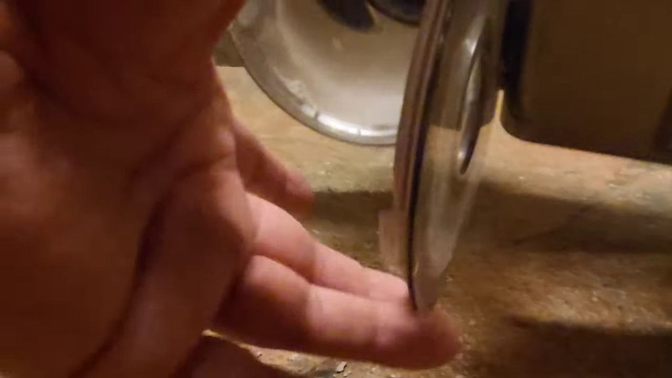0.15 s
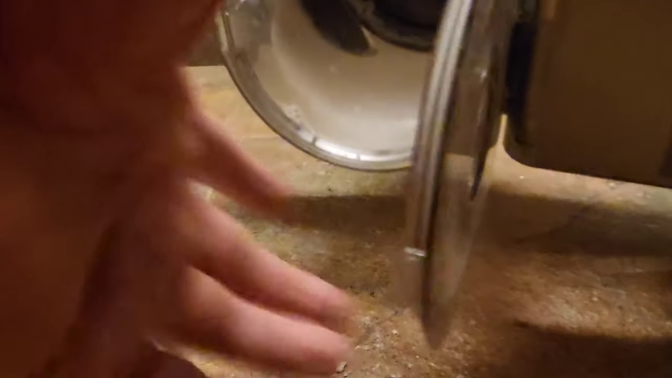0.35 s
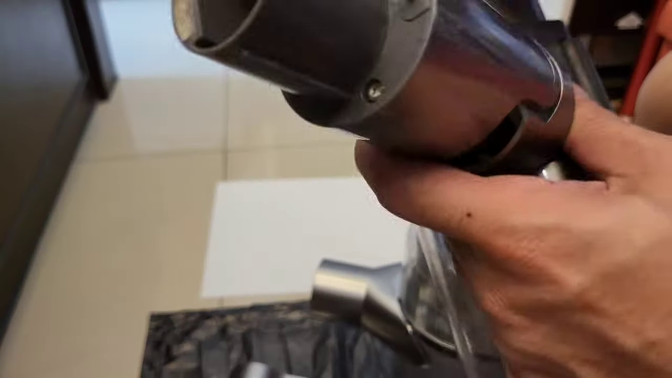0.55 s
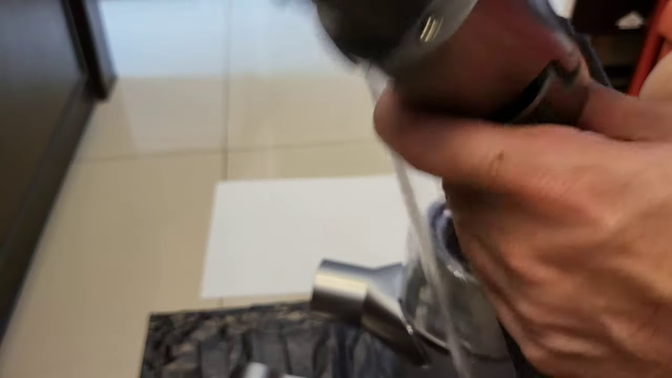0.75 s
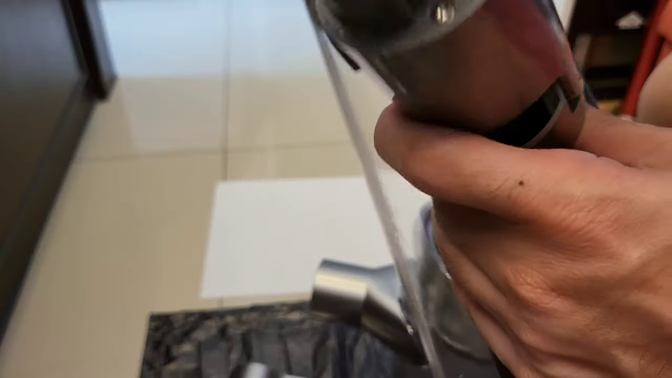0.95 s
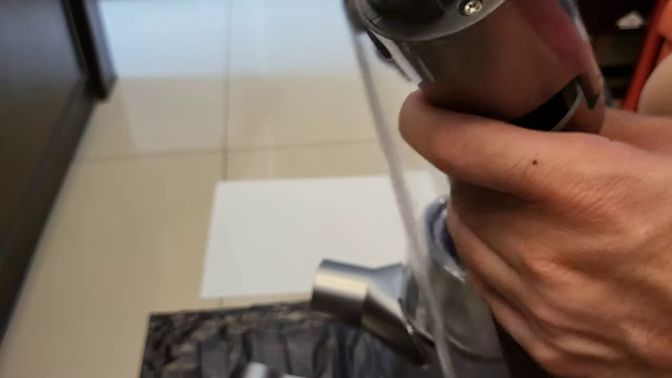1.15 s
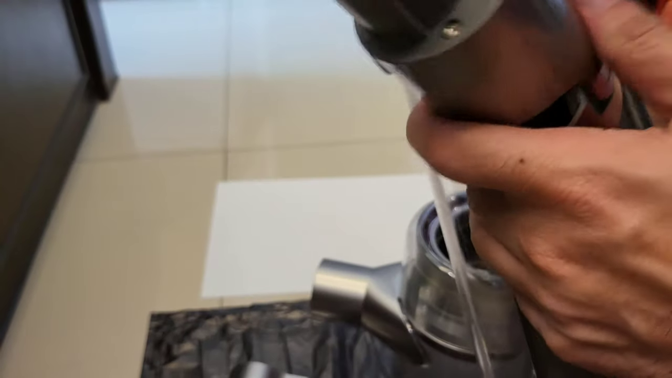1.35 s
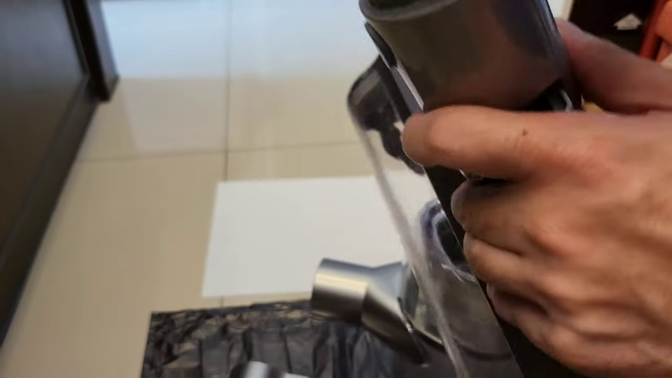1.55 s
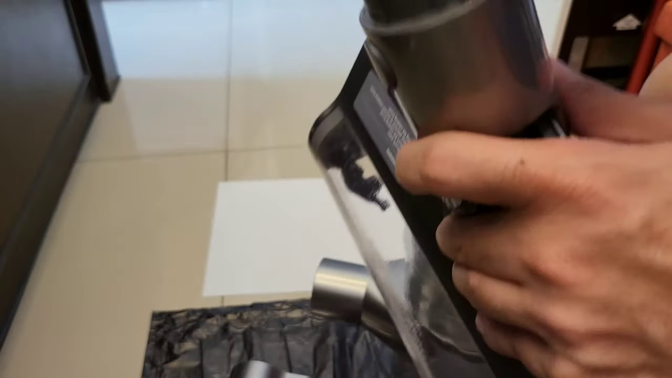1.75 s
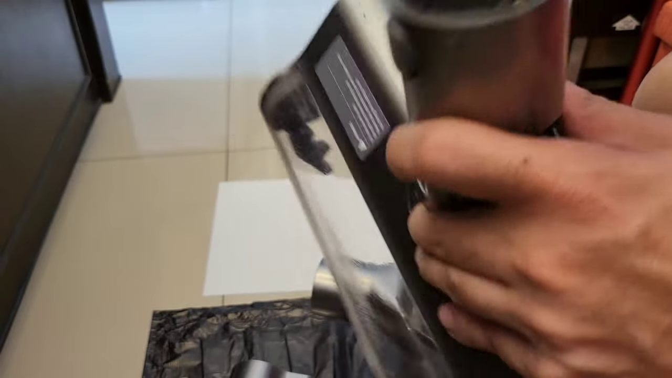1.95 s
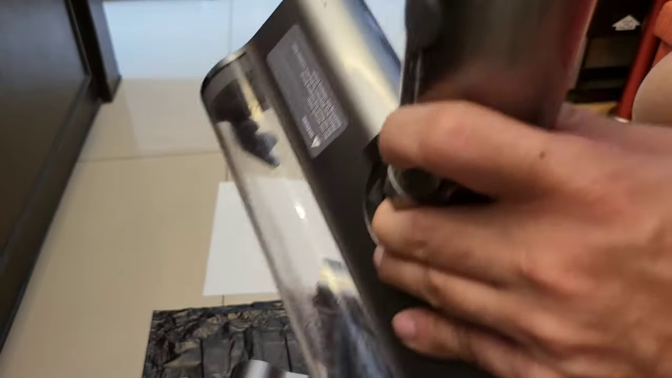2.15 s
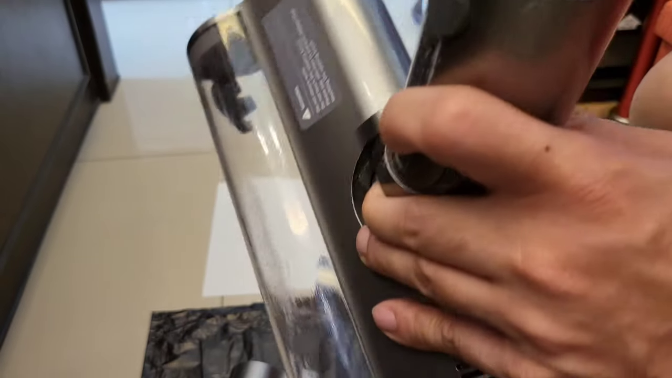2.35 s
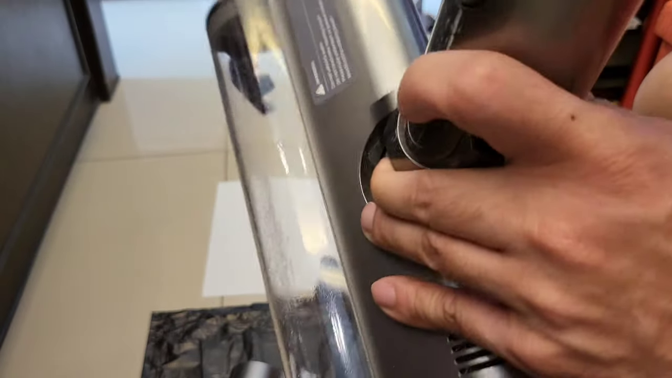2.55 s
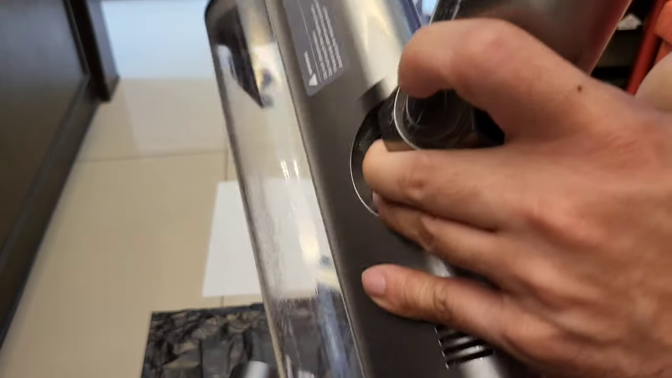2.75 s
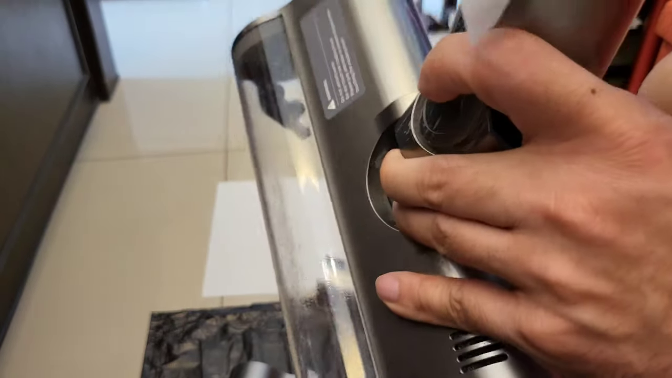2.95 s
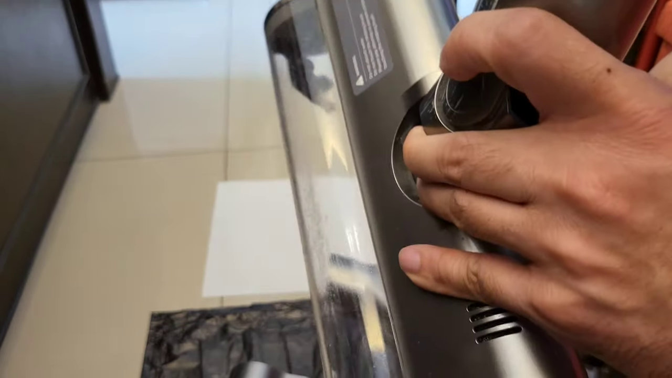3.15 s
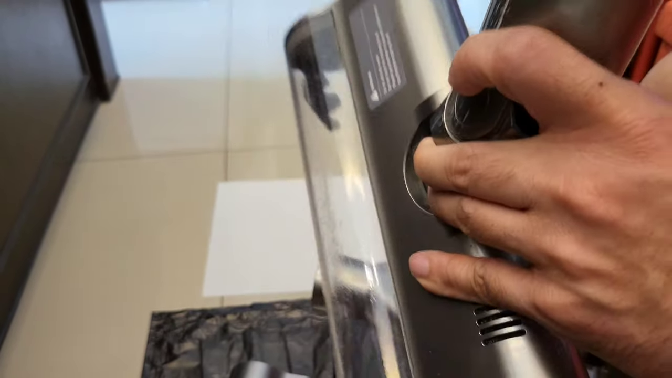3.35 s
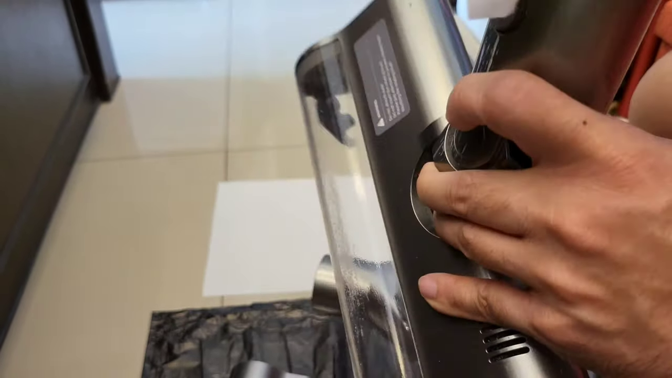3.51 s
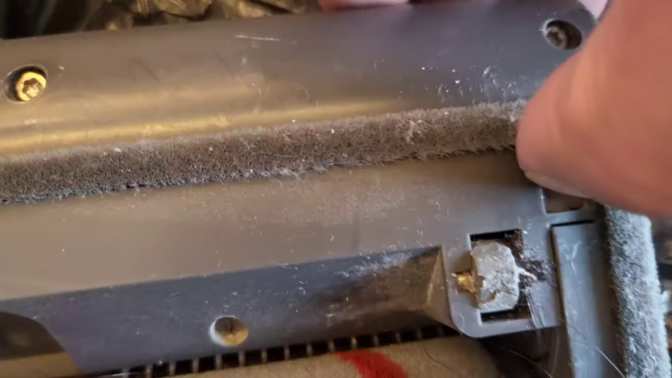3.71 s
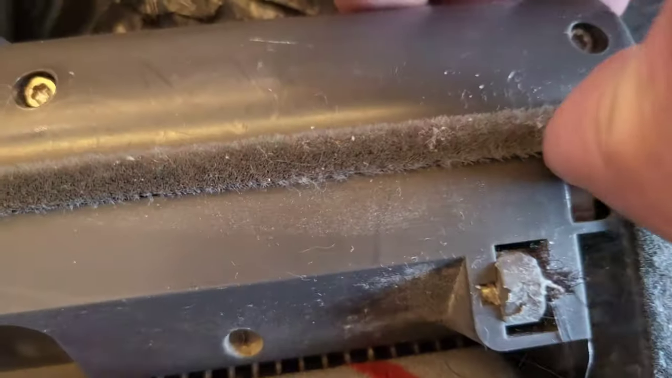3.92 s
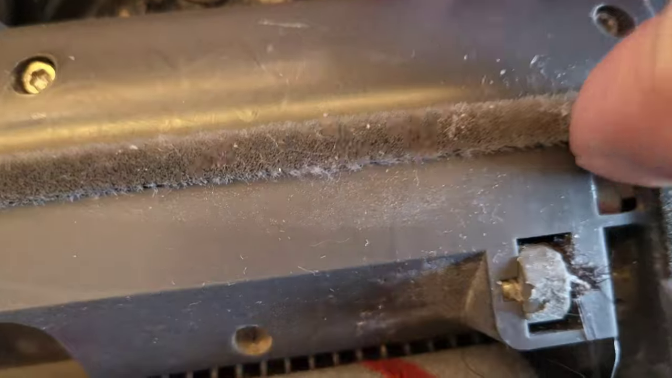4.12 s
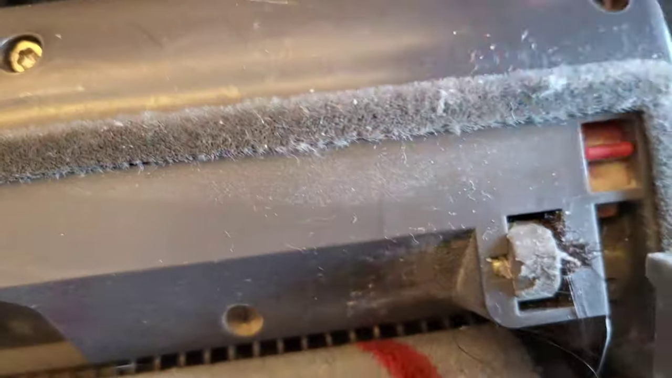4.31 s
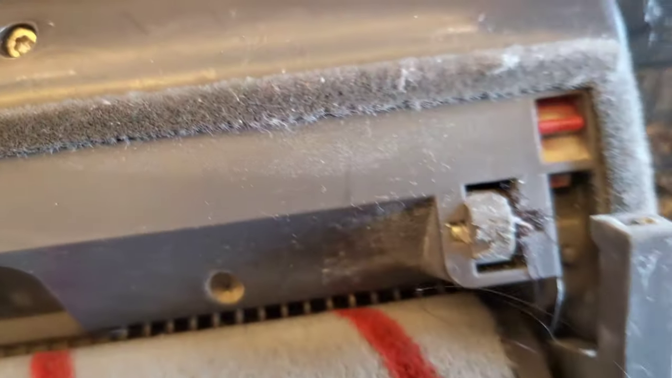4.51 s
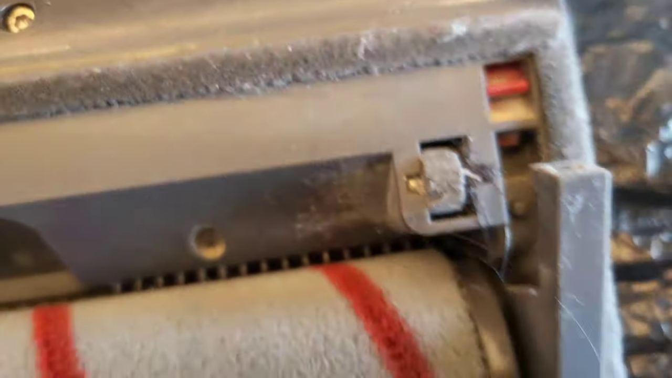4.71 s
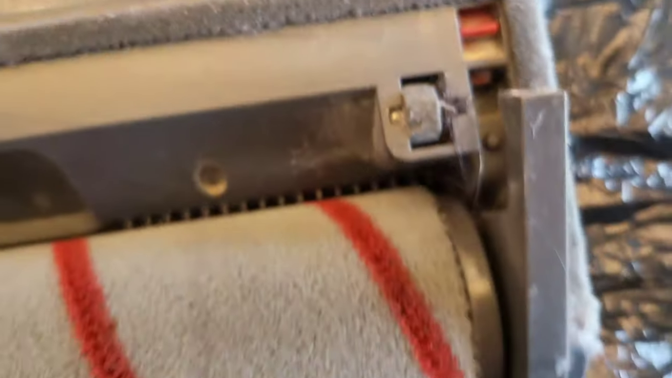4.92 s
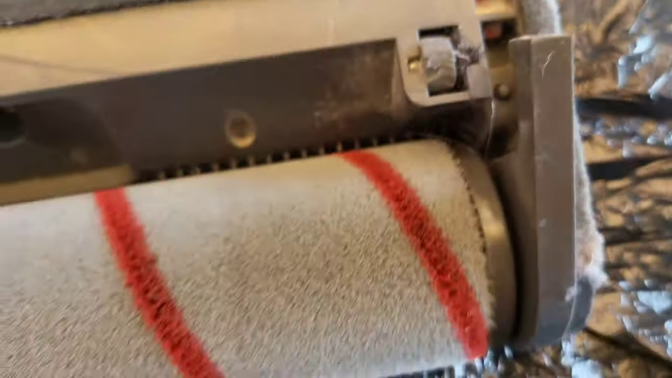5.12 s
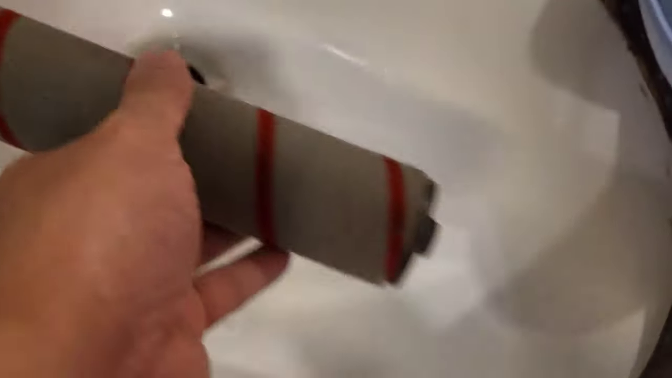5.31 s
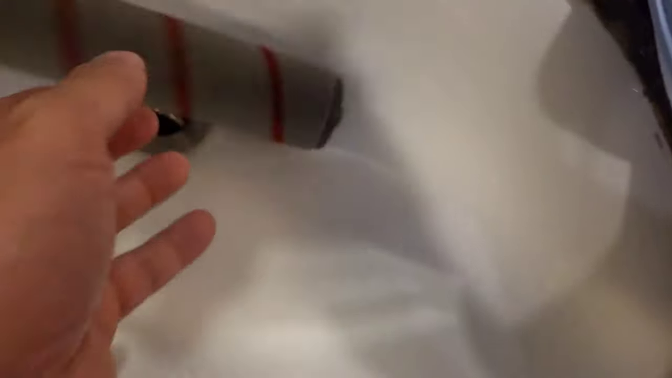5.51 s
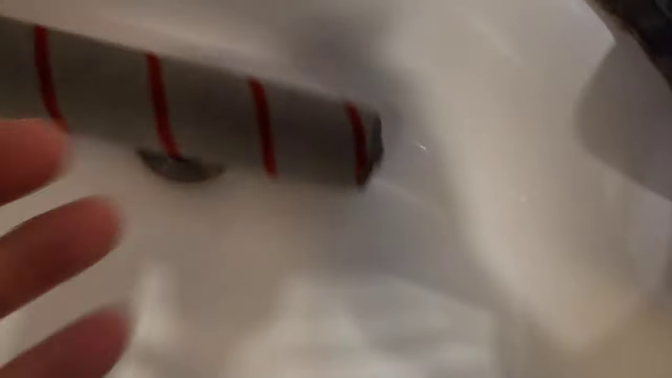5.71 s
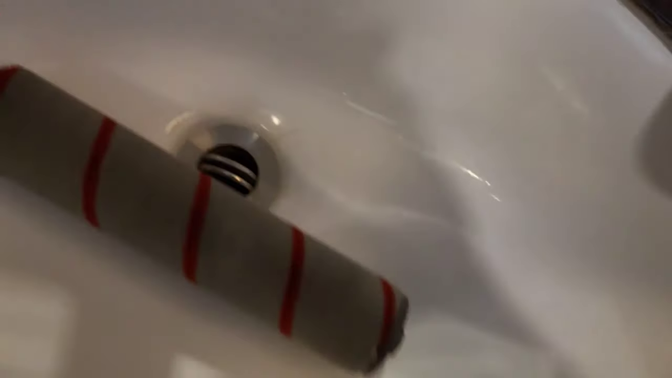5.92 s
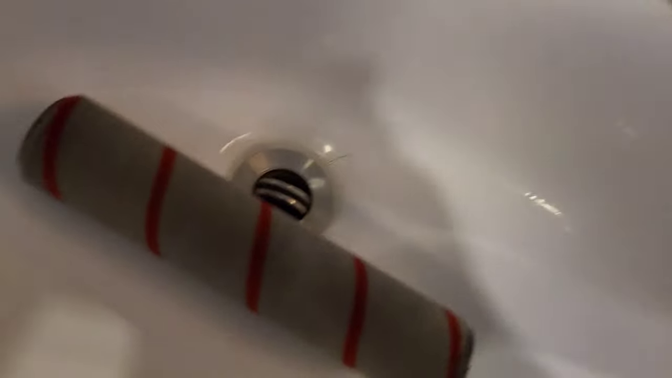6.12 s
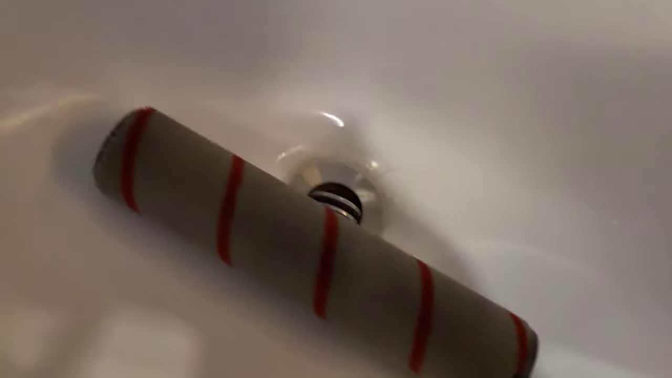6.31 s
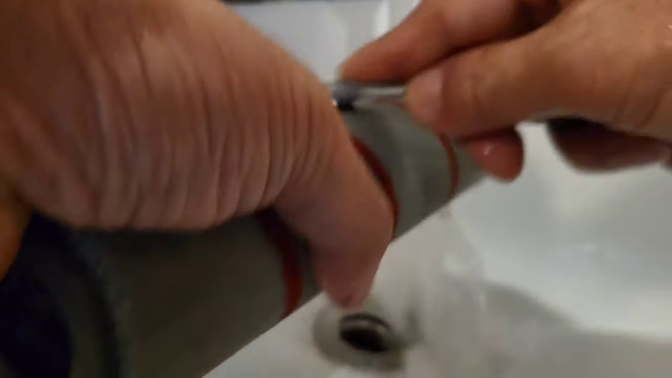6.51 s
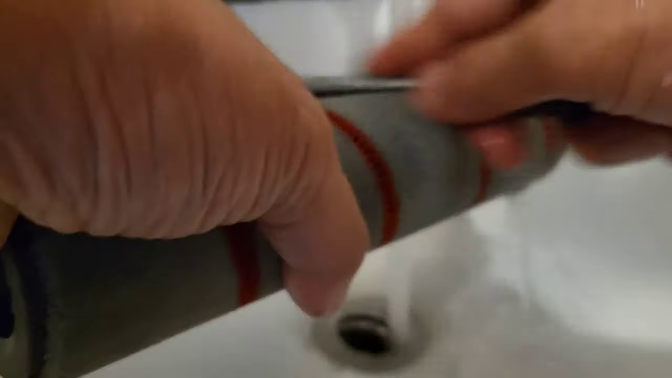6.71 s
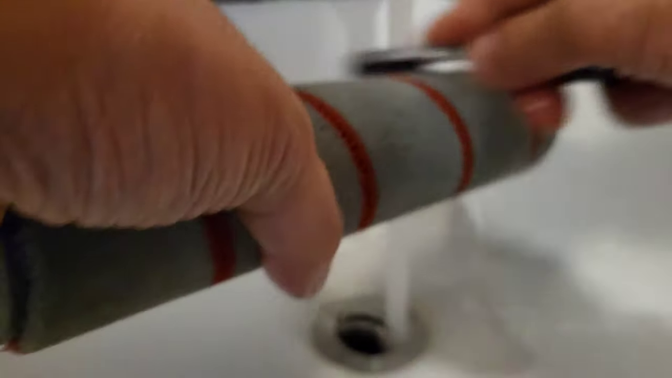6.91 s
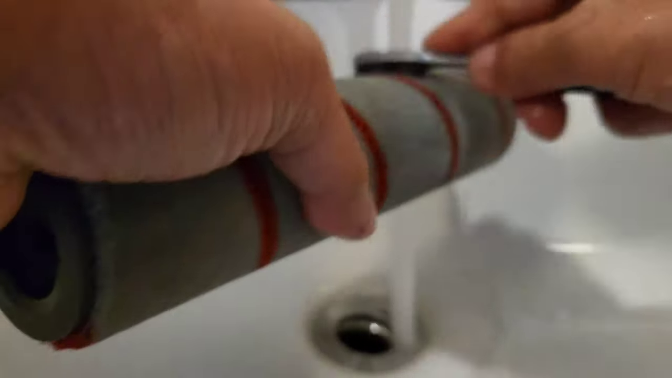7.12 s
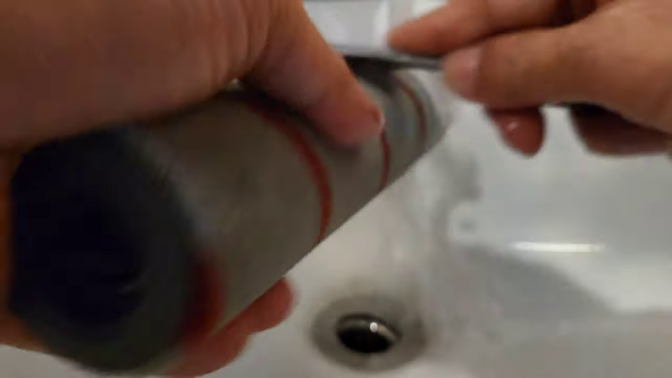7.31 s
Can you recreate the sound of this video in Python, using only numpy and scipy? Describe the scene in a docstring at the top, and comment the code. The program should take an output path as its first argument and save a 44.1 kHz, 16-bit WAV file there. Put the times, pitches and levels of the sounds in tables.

```python
"""Five short indoor scenes, cut together, heard by a phone with two spaced ports.
First come room rumble, air and fine hiss (shaped noise), with brushing skin and cloth (swells of that hiss).
Then hands turn a plastic vacuum head that ticks, and a latch snaps twice (ringing modes, clatter, crack).
The brush roller is dropped and bounces in a ceramic basin, whose low modes boom on.
Last the tap runs over it: spray noise with bubbles, low churn, gulps and the basin tones they wake
(decaying sines), narrow-band whistles."""
import sys
import numpy as np
from scipy import signal
from scipy.fft import rfft, irfft
from scipy.io import wavfile
from scipy.ndimage import uniform_filter1d

SR = 44100
rng = np.random.default_rng(int(sys.argv[2]) if len(sys.argv) > 2 else 0)


def wav_out(sig):
    """Save sig, one row per channel (or a flat mono array), as 16-bit PCM at SR to the path in sys.argv[1]."""
    wavfile.write(sys.argv[1], SR, np.round(np.clip(np.atleast_2d(sig).T, -1, 1) * 32767).astype(np.int16))


N = 324576  # length [samples]


def undb(db):
    """Turn decibels into an amplitude factor."""
    return 10 ** (np.asarray(db) / 20)


def add(out, s, x):
    """Mix a short stereo sound in at time s."""
    i = int(s * SR)
    out[:, i:i + x.shape[1]] += x[:, :N - i]


def walk(rate):
    """Random levels held 1 / rate s and smoothed twice; spread near 1."""
    hold = int(SR / rate)
    steps = np.repeat(rng.standard_normal(N // hold + 1), hold)
    return 1.3 * uniform_filter1d(uniform_filter1d(steps, hold), hold)[:N]


# how alike left and right noise are: (frequency [Hz], correlation [0-1])
PORT_LIKENESS = [(25, 0.7), (60, 1), (200, 0.95), (400, 0), (800, 0), (16000, 0)]


def noise(spectrum, flicker_db, rate, start=0):
    """Stereo noise in six bands, each flickering on its own; alike left and right only in the bass."""
    n = N - start
    logf = np.log(np.fft.rfftfreq(n, 1 / SR) + 1)
    hz, db = np.transpose(spectrum)
    gain = undb(np.interp(logf, np.log(hz), db, left=-99, right=-99))
    like_hz, correlation = np.transpose(PORT_LIKENESS)
    like = np.clip(np.interp(logf, np.log(like_hz), correlation), 0, 1)
    mid, side = rfft(rng.standard_normal((2, n))) * gain * np.sqrt([1 + like, 1 - like])
    audible = logf[gain > 1e-4]
    centres = np.linspace(audible[0], audible[-1], 6)
    out = np.zeros((2, N))
    for k in range(6):
        share = np.interp(logf, centres, np.arange(6) == k)  # triangular band
        band = irfft([(mid + side) * share, (mid - side) * share], n)
        out[:, start:] += band * undb(flicker_db * walk(rate))[:n]
    return out / np.sqrt(np.mean(out[:, start:].mean(axis=0) ** 2))


def ring(modes, weight_db, push_s, lag_s, scatter=0.):
    """Decaying modes after a short push; lag delays the left port's phase, scatter varies pitch, size, phase."""
    hz, db, t60 = np.transpose(modes)[:, :, None]
    t = np.arange(int(.5 * SR)) / SR
    # treble modes scatter most
    turn, size, shift = rng.standard_normal((3, 2, len(modes), 1)) * scatter * np.clip(hz / 2500, 0, 1)
    hz = hz * (1 + 0.042 * shift[0])
    lag = np.array([lag_s, 0])[:, None, None]
    # the [0] draws are shared by both ports, the full ones differ
    phase = 2 * np.pi * hz * (t - lag) + 4 * turn[0] + 1.23 * turn
    wave = np.sin(phase) * np.exp(-np.log(1000) * t / t60)
    size_db = 2.5 * size[0] + 1.5 * size
    push = (1 - np.exp(-t / push_s)) ** 2
    return (wave * undb(db + weight_db + size_db)).sum(axis=1) * push


def knocks(table, modes, focus_db, push_s, lag_s, scatter, clatter_db, crack_hz, crack_s, tail_s, tail_db):
    """Every blow rings the same modes, strongest near its own pitch region, with rough clatter and bright crack.
    A soft blow (weak crack) pushes longer and wakes fewer modes."""
    out, t = np.zeros((2, N)), np.arange(int(.5 * SR)) / SR
    bright = np.vstack([signal.butter(2, crack_hz[0], "high", fs=SR, output="sos"),
                        signal.butter(1, crack_hz[1], fs=SR, output="sos")])
    for s, db, focus_hz, crack_db, pan_db, *_ in table:
        soft = np.clip(-crack_db / 30, .15, 1)
        octaves = np.log2(np.array(modes)[:, :1] / focus_hz)
        body = ring(modes, -soft * focus_db * np.abs(octaves), soft * push_s, lag_s, scatter=scatter)
        body /= np.sqrt(np.mean(np.abs(body).max(axis=1) ** 2))
        push = (1 - np.exp(-t / (soft * push_s))) ** 2
        fade = (np.exp(-t / crack_s) + undb(tail_db) * np.exp(-t / tail_s)) * push
        # grit is partly common to both ports, the left one later
        shared, left, right = rng.standard_normal((3, len(t)))
        grit = np.array([np.roll(shared, int(lag_s * SR)) + .7 * left, shared + .7 * right])
        around = signal.butter(2, [0.5 * focus_hz, 2.35 * focus_hz], "band", fs=SR, output="sos")
        clatter = signal.sosfilt(around, grit) * undb(clatter_db)
        crack = signal.sosfilt(bright, grit) * undb(crack_db)
        sides_db = np.array([[pan_db], [-pan_db]]) / 2
        add(out, s, (body + (clatter + crack) * fade) * undb(db + sides_db))
    return out


def echo(x, t60, wet_db, damp_hz):
    """Reflections: a decaying noise response, different at each port."""
    t = np.arange(int(.4 * SR)) / SR
    tail = rng.standard_normal((2, len(t))) * np.exp(-np.log(1000) * t / t60) * (t > .003)
    tail = signal.sosfilt(signal.butter(1, damp_hz, fs=SR, output="sos"), tail)
    tail = signal.sosfilt(signal.butter(2, 350, "high", fs=SR, output="sos"), tail)
    tail /= np.sqrt((tail[0] ** 2).sum())
    return x + undb(wet_db) * signal.fftconvolve(x, tail, axes=1)[:, :N]


# edges of the five scenes: (time [s])
SCENE_EDGES = [0, .59, 3.719, 5.25, 6.62, 7.36]
# background of each scene before it dips: (rumble level [dB], air level [dB], fine hiss level [dB])
SCENE_LEVELS = [(-32, -58, -66), (-37.5, -50.5, -65.5), (-39.5, -49, -61.5), (-30.5, -52, -57.5),
                (-33.5, -53, -53)]
# rumble colour of the four places: (frequency [Hz], relative density [dB per Hz])
RUMBLE_COLOURS = [
    [(12, -40), (20, -17), (85, 1.5), (166, -14), (215, -5.5), (335, -20.5), (375, -8), (454, -19),
     (900, -28.5), (1170, -70), (1980, -120)],
    [(12, -35), (20, -9), (117, -1.5), (244, -26), (290, -20), (357, -11.5), (491, -19), (524, -28),
     (634, -15), (900, -28), (1170, -64), (1980, -120)],
    [(12, -39), (20, 2), (123, 0.5), (140, -0.5), (174, -2), (558, -8), (755, -12), (900, -43.5),
     (1170, -57), (1980, -120)],
    [(12, -34), (20, -22.5), (108, -3), (186, -16.5), (281, -15.5), (335, -23.5), (454, -16.5),
     (541, -32.5), (654, -14.5), (709, -29.5), (900, -32.5), (1170, -64), (1980, -120)],
]
# colour of the air noise: (frequency [Hz], relative density [dB per Hz])
AIR_COLOUR = [(470, -30.5), (800, -1.5), (1120, -3.5), (1370, -0.5), (1690, -7), (2390, -8.5), (4470, -29),
              (6000, -36.5), (7800, -56), (13200, -120)]
# colour of the fine hiss and of the brushing: (frequency [Hz], relative density [dB per Hz])
HISS_COLOUR = [(1060, -8.5), (1800, -5.5), (2570, -3), (4120, -6), (4430, -8.5), (7100, -7), (8440, -17),
               (13700, -16), (15800, -21)]
CUT_FADE_S = .006
DIP_DB = (10, 14.5, 7.5)  # deepest dip of rumble, air, fine hiss


def room_tone():
    """Each place has its own rumble; air noise, fine hiss and brushing lie over it."""
    t = np.arange(N) / SR
    place = np.searchsorted(SCENE_EDGES[1:-1], t)
    is_here = 1. * (place == np.arange(len(SCENE_LEVELS))[:, None])
    here = uniform_filter1d(is_here, int(CUT_FADE_S * SR))
    rumble_db, air_db, hiss_db = np.transpose(SCENE_LEVELS) @ here - np.outer(DIP_DB, dip())
    share = [*here[:3], here[3] + here[4]]  # the last two scenes are in the same washroom
    rumble = sum(noise(colour, 0.8, 6) * on for colour, on in zip(RUMBLE_COLOURS, share)) * undb(rumble_db)
    air = noise(AIR_COLOUR, 1.0, 37) * undb(air_db)
    brush = scuffs() * undb(2.0 * walk(70))
    fine = noise(HISS_COLOUR, 3.3, 13) * (undb(hiss_db) + brush)
    return rumble + air + fine + washroom_tone(t) * share[3]


def dip():
    """How far the background has sunk (0-1): every snap and bounce pushes it down, and it creeps back."""
    knee_db, fall_s, back_s = 4.5, 0.041, 0.36
    t = np.arange(N) / SR
    sunk = 0
    for s, db, *_ in LATCH_SNAPS + ROLLER_BOUNCES:
        after = np.clip(t - s, 0, None)
        sunk = sunk + undb(db - knee_db) * (1 - np.exp(-after / fall_s)) * np.exp(-after / back_s)
    return np.tanh(sunk)


# skin and cloth brush a surface: (start [s], length before the end fade [s], level before flicker [dB])
BRUSHES = [(0.422, 0.03, -63.5), (0.55, 0.047, -52.5), (0.874, 0.059, -49), (1.373, 0.01, -50),
           (1.095, 0.067, -63), (1.657, 0.19, -64.5), (1.888, 0.044, -55.5), (2.291, 0.048, -50),
           (2.386, 0.011, -60), (2.638, 0.066, -59.5), (2.981, 0.0081, -43), (3.523, 0.071, -49.5),
           (4.259, 0.12, -54), (4.738, .12, -64), (5.1, 0.042, -62.5), (5.4, .1, -61), (5.588, 0.05, -37.5),
           (6.222, 0.045, -62), (6.281, 0.12, -47), (6.509, 0.22, -51)]


def scuffs():
    """Loudness of the brushing: quick rise, steady hold, quick end."""
    rise_s, end_s = 0.009, 0.022
    t = np.arange(N) / SR
    return sum(undb(db) * np.interp(t, [s, s + rise_s, s + length, s + length + end_s], [0, 1, 1, 0])
               for s, length, db in BRUSHES)


# plastic housing ticks:
# (time [s], body peak [dB], loudest mode region [Hz], crack against peak [dB], left minus right [dB])
HOUSING_TICKS = [(0.5692, -23.5, 730, -12.5, -4), (0.8692, -20, 3000, -2, -1), (0.889, -10, 3130, -4, 0.5),
                 (1.0323, -12.5, 1600, -16, -3.5), (1.0627, -12.5, 1790, -41, -2),
                 (1.1046, -20.5, 1480, -30, -6), (1.3785, -33, 2330, -13, -1),
                 (1.5051, -22, 695, -1.5, -0.5), (1.5824, -21.5, 1660, -38, -5),
                 (1.6235, -28, 1560, -32, -9), (1.6507, -8, 1440, -43, -0.5),
                 (1.8234, -30.5, 1660, -14, -0.5), (1.8593, -22, 1790, -38, -5),
                 (2.2127, -13, 800, -12, 3.5), (2.2838, -10, 2370, 0.5, 3), (2.332, -26.5, 1540, -24, -6),
                 (2.3706, -22, 1490, -16, -1), (2.4874, -16.5, 1420, -24, -2),
                 (2.575, -23.5, 1500, -36, -3), (2.7355, -20.5, 1520, -34, 2), (2.8096, -28, 730, -14, 4),
                 (2.9272, -19.5, 1250, -29, 5.5), (2.9874, -23, 2340, -4, 2),
                 (3.1852, -19.5, 1480, -41, -4), (3.2317, -21, 1490, -40, -7),
                 (3.4462, -18.5, 1510, -33, -2)]
# modes of the plastic housing: (frequency [Hz], relative level [dB], t60 [s])
HOUSING_MODES = [(780, 0, .03), (1100, -5, .02), (1400, -2, .022), (1570, 0, .026), (1900, -1, .024),
                 (2300, 0, .022), (2600, -3, .018), (3300, -2, .014), (4200, -3, .012), (5200, -3, .012),
                 (6300, -5, .01), (13500, 0, .008)]


def housing_ticks():
    """The plastic shell of the vacuum head rings briefly, with a short echo."""
    dry_ticks = knocks(HOUSING_TICKS, HOUSING_MODES, focus_db=27.5, push_s=0.00038, lag_s=.0005, scatter=1.0,
                       clatter_db=-9.5, crack_hz=(3000, 7000), crack_s=0.0011, tail_s=0.038, tail_db=-24.5)
    return echo(dry_ticks, t60=0.07, wet_db=-10, damp_hz=7400)


# latch clicks:
# (time [s], body peak [dB], loudest mode region [Hz], crack against peak [dB], left minus right [dB])
LATCH_SNAPS = [(4.0672, 5.5, 1380, -6.5, -0.7), (4.0893, -19, 1270, 0, 5), (4.283, -31.5, 1420, -8.5, 3.5),
               (4.328, 0, 3480, -11.5, 3.5), (4.3402, -23.5, 3250, -17, 13.5)]
# modes of the latch: (frequency [Hz], relative level [dB], t60 [s])
LATCH_MODES = [(350, -5.5, 0.046), (523, -8, 0.07), (910, -22, 0.016), (1380, 7.5, 0.02),
               (1890, 3.5, 0.016), (2340, -1, 0.037), (3310, 12.5, 0.0093), (3350, 5, 0.025),
               (4090, 10, 0.0084), (4970, 3.5, 0.012), (5870, 3.5, 0.019), (8300, -8, 0.01),
               (13560, 10, 0.02), (14000, 8.5, .01)]


def latch_snaps():
    """The latch rings in short bright modes, with a faint echo."""
    dry_snaps = knocks(LATCH_SNAPS, LATCH_MODES, focus_db=17.5, push_s=0.0016, lag_s=0.0002, scatter=0.25,
                       clatter_db=3, crack_hz=(3500, 12000), crack_s=0.0016, tail_s=0.03, tail_db=-27)
    return echo(dry_snaps, t60=0.18, wet_db=-21.5, damp_hz=5700)


# a spring sings on after the two main snaps, latch pulled and latch let go: (time [s])
SPRING_TIMES = (4.069, 4.335)
# its modes, one list for each snap: (frequency [Hz], level [dB], t60 [s])
SPRING_MODES = [
    [(1270, -40, 0.9)],
    [(1200, -31, 0.45), (2420, -39, .35), (3330, -42, .65), (3620, -38, 0.3)],
]


def spring():
    """Thin metal tones left after the latch snaps, as slowly decaying modes."""
    out = np.zeros((2, N))
    for s, modes in zip(SPRING_TIMES, SPRING_MODES):
        add(out, s, ring(modes, 0, push_s=0.0078, lag_s=0.00021))
    return out


# wavering tone in the washroom: (frequency [Hz], mean level [dB])
WASHROOM_TONE = [(642, -69)]


def washroom_tone(t):
    """A sine whose level and phase wander."""
    return sum(undb(db + 3.4 * walk(9.6)) * np.sin(2 * np.pi * (hz * t + 0.37 * walk(11)))
               for hz, db in WASHROOM_TONE)


# roller bounces: (time [s], body peak [dB], loudest mode region [Hz], crack against peak [dB],
# left minus right [dB], boom of the bowl [dB])
ROLLER_BOUNCES = [(5.6161, 1.5, 930, -6.5, 3, -17.5), (5.667, 2, 1410, -5.5, -1.5, -17),
                  (5.686, 1, 900, -5.5, 0, -16.5), (5.727, -11, 5050, -13, 3, -25),
                  (5.767, -1.5, 810, -9.5, -0.5, -20), (5.827, -18, 799, -6, 0, -19.5),
                  (5.833, 2.5, 1380, -4, 0.5, -16), (5.9159, -2.5, 1710, -2, 0.5, -19),
                  (5.953, -11, 1460, -6.5, -4, -19.5)]
# modes of the ceramic basin: (frequency [Hz], relative level [dB], t60 [s])
BASIN_MODES = [(420, 1.5, 0.048), (640, -14.5, 0.046), (800, -6, 0.077), (1085, -10, 0.043),
               (1270, -14, 0.032), (1410, 8.5, 0.01), (1558, -7.5, 0.061), (2035, -9, 0.027),
               (2244, 5.5, 0.015), (2412, -25, 0.36), (2770, -3, 0.031), (3384, -5.5, 0.038),
               (4840, -16, 0.076), (5600, -6.5, 0.029), (7600, -7, 0.046)]


def roller_bounces():
    """The dropped roller strikes the ceramic modes of the basin, with a strong short echo."""
    dry_bounces = knocks(ROLLER_BOUNCES, BASIN_MODES, focus_db=28.5, push_s=0.0025, lag_s=0.00025, scatter=0.84,
                         clatter_db=-2, crack_hz=(3000, 4000), crack_s=0.0027, tail_s=0.022, tail_db=-18.0)
    return echo(dry_bounces, t60=0.17, wet_db=-6.5, damp_hz=7100)


# low modes of the basin: (frequency [Hz], level against the boom [dB], t60 [s])
BOWL_MODES = [(143.5, 6, 0.44), (250.6, 6.5, 0.18)]


def bowl():
    """The low modes of the basin boom on after each bounce."""
    out = np.zeros((2, N))
    for s, *_, boom_db in ROLLER_BOUNCES:
        add(out, s, ring(BOWL_MODES, boom_db, push_s=0.0031, lag_s=0.00019))
    return out


TAP_S = 6.62  # the last scene starts with the water running


def tap():
    """Spray hiss with bubbles in it, low churn, gulps with basin tones, and brief whistles."""
    early = np.interp(np.arange(N) / SR, (6.63, 7.055), [1, 0])  # 1 before the spray swells, 0 after
    out = spray(early) + churn(early) + gulps_and_basin_tones() + whistles()
    return out * (np.arange(N) >= int(TAP_S * SR))


# colour of the spray hiss: (frequency [Hz], relative density [dB per Hz])
SPRAY_COLOUR = [(410, -43), (700, -19), (1040, -23), (1180, -6), (1770, -23), (2040, -6), (2860, -4),
                (3300, -2.5), (4290, -7.5), (7320, -4.5), (8230, -8), (11000, -7), (13500, -8), (15800, -7)]
SPRAY_DB, SPRAY_RISE_DB = -17, 6.5  # final level before panning, and the swell up to it


def spray(early):
    """Hiss, bubbles and crackling droplets swell over the first part of the scene."""
    water = noise(SPRAY_COLOUR, 1.5, 35, start=int(TAP_S * SR))
    water += undb(-13) * bubbles(count=300, lo_hz=1300, hi_hz=6500, cycles=16, spread_db=3.0)
    droplets = bubbles(count=500, lo_hz=2950, hi_hz=13400, cycles=1.4, spread_db=4.0)
    water += undb(-10.5) * droplets
    return water * undb(SPRAY_DB - SPRAY_RISE_DB * early + np.array([[.8], [-.8]]))


def bubbles(count, lo_hz, hi_hz, cycles, spread_db):
    """Small bubbles in the stream: short rising sines, each at its own place."""
    out = np.zeros((2, N))
    for when, pitch, size, pan in rng.random((count, 4)):
        hz = lo_hz * (hi_hz / lo_hz) ** pitch
        turns = np.arange(int(3 * cycles * SR / hz)) * hz / SR
        rising = np.sin(2 * np.pi * turns * (1 + 0.0504 * turns / cycles))
        wave = rising * np.exp(-turns / cycles) * (1 - np.exp(-turns))
        level = undb(-spread_db * np.log(size + 0.00055))  # a few are much louder
        add(out, TAP_S + when * (N / SR - TAP_S), wave * level * np.array([[pan], [1 - pan]]))
    return out / np.sqrt(np.mean(out[:, int(TAP_S * SR):].mean(axis=0) ** 2))


# colour of the churning water: (frequency [Hz], relative density [dB per Hz])
CHURN_COLOUR = [(88, -28), (150, -8), (232, 2), (306, -4), (411, 6), (459, -4), (621, -0.5), (1000, -11.5),
                (1300, -45), (2200, -120)]
CHURN_DB, CHURN_FALL_DB = -29, 2  # final level, and the fall down to it


def churn(early):
    """Low flickering noise that calms as the spray swells."""
    return noise(CHURN_COLOUR, 3.2, 32.5, start=int(TAP_S * SR)) * undb(CHURN_DB + CHURN_FALL_DB * early)


# gulps and the basin tones they wake: (time [s], level [dB], pitch [Hz], t60 [s])
GULPS_AND_BASIN_TONES = [(6.626, -8, 272, 0.13), (6.656, -11.5, 383, 0.047), (6.691, -3, 388, 0.064),
                         (6.738, -13, 396, 0.1), (6.755, -12.5, 413, 0.13), (6.777, -17, 417, .05),
                         (6.835, -2, 600, 0.044), (6.837, 5.5, 394, 0.04), (6.84, -10.5, 253, 0.17),
                         (6.869, -5.5, 400, 0.075), (6.869, -10.5, 632, .1), (6.897, -8, 413, 0.038),
                         (6.983, -19, 443, 0.16), (7.092, -9, 349.7, 0.035), (7.209, -21, 416, 0.086)]


def gulps_and_basin_tones():
    """Each row is one decaying mode: a gulp or a basin tone it rings, its phase ahead at the left port."""
    out = np.zeros((2, N))
    for s, db, hz, t60 in GULPS_AND_BASIN_TONES:
        add(out, s, ring([(hz, db, t60)], 0, push_s=0.0026, lag_s=-0.00022))
    return out


# the stream whistles briefly: (middle [s], length at half height [s], pitch [Hz], level [dB])
STREAM_WHISTLES = [(6.634, 0.058, 1596, -26.5), (6.752, 0.083, 2010, -24), (6.822, .09, 3240, -27),
                   (6.904, 0.039, 2120, -26.5), (6.973, 0.072, 3360, -27.5), (7.041, 0.072, 2030, -28.5),
                   (7.099, 0.047, 3280, -22.5), (7.185, 0.056, 3320, -24.5)]


def whistles():
    """Each whistle swells and fades around its middle."""
    out = np.zeros((2, N))
    for s, length, hz, db in STREAM_WHISTLES:
        add(out, s - length, whistle(length, hz, db))
    return out


def whistle(length, hz, db):
    """A narrow band of noise that swells and fades."""
    width = 0.06  # share of the pitch, each side
    band = signal.butter(2, [hz * (1 - width), hz * (1 + width)], "band", fs=SR, output="sos")
    x = signal.sosfilt(band, rng.standard_normal((2, SR // 2)))
    n = int(2 * length * SR)
    return x[:, -n:] / x.mean(axis=0).std() * np.hanning(n) * undb(db)


def scene():
    """Room, ticking head, latch and its spring, bouncing roller and booming bowl, running tap."""
    return (room_tone() + housing_ticks() + latch_snaps() + spring()
            + roller_bounces() + bowl() + tap())


def record(dry):
    """The port resonance lifts the high treble, then a step down; peaks are rounded and the top is cut."""
    resonance = signal.butter(1, (12400, 14000), "band", fs=SR, output="sos")
    x = dry + undb(-14.5) * signal.sosfilt(resonance, dry)
    step_down = signal.ellip(6, .3, 24, 15500, fs=SR, output="sos")
    x = signal.sosfilt(step_down, x)
    rounded = x / (1 + x ** 4) ** .25
    top_cut = signal.ellip(10, .2, 80, 16400, fs=SR, output="sos")
    return signal.sosfilt(top_cut, rounded)


dry = scene()
out = record(dry)
wav_out(out)
```